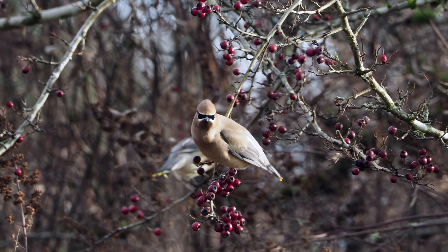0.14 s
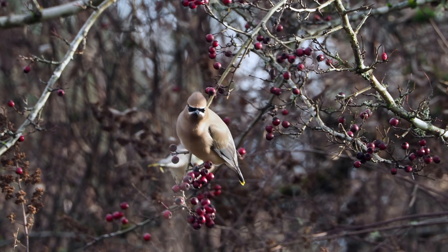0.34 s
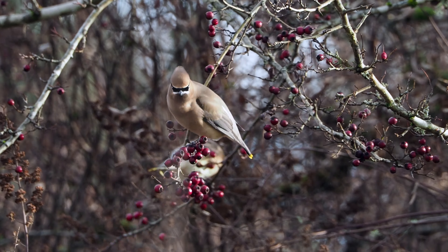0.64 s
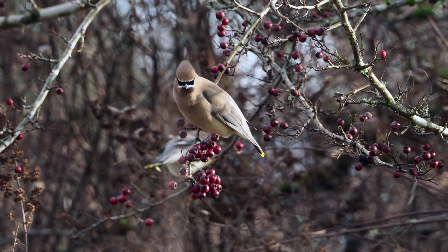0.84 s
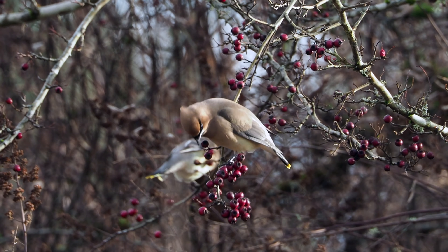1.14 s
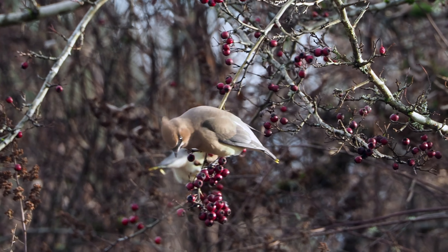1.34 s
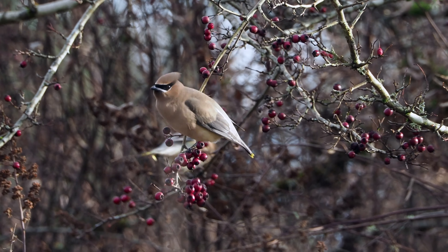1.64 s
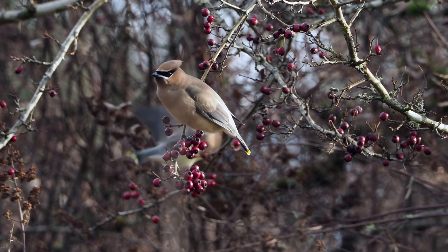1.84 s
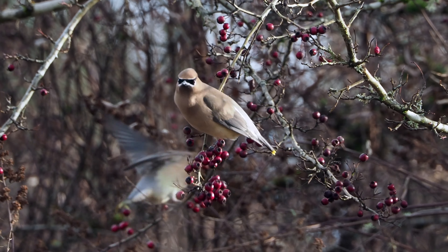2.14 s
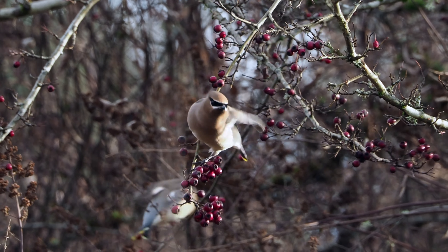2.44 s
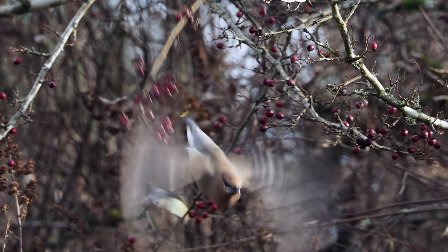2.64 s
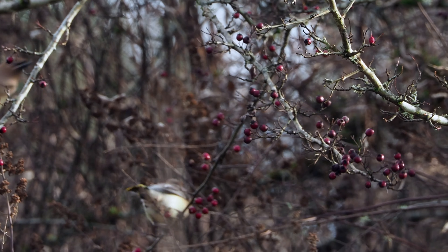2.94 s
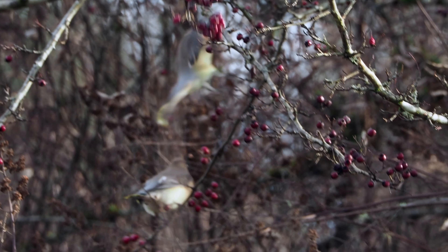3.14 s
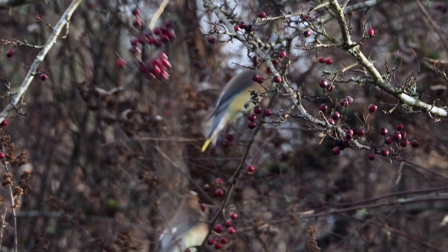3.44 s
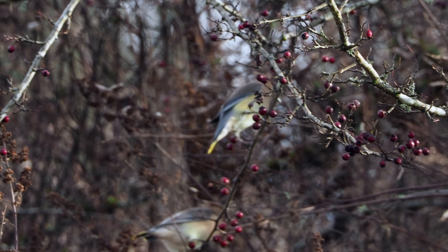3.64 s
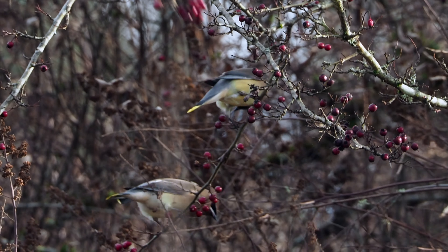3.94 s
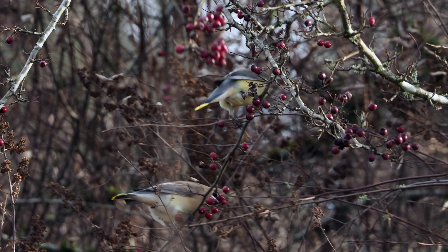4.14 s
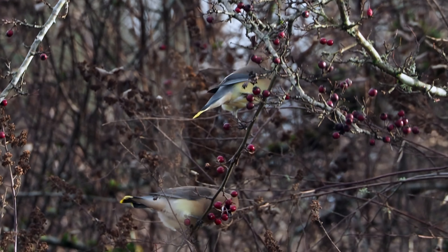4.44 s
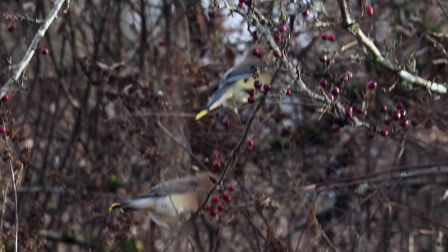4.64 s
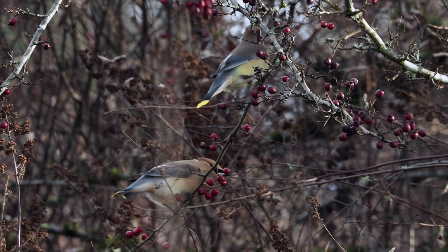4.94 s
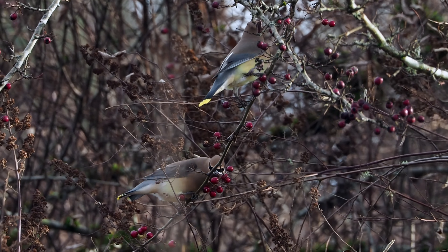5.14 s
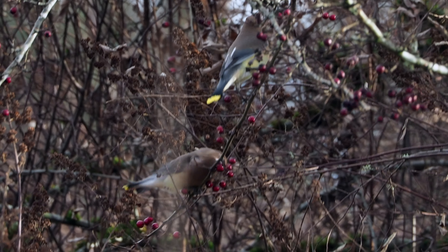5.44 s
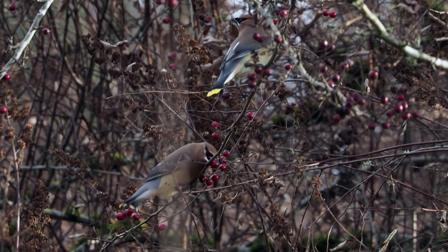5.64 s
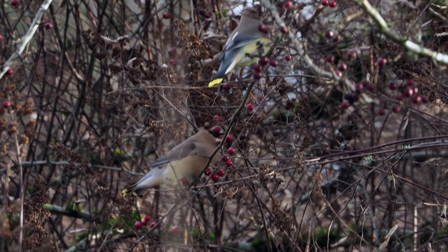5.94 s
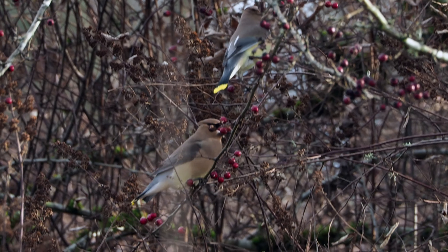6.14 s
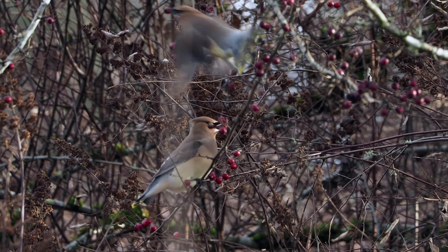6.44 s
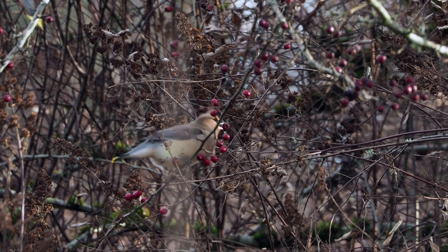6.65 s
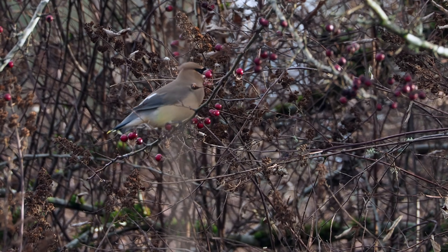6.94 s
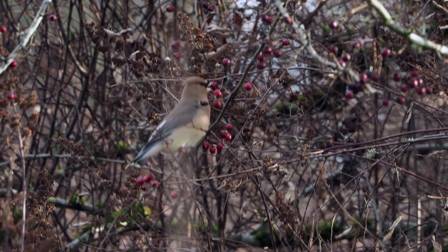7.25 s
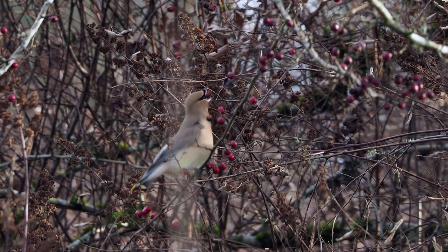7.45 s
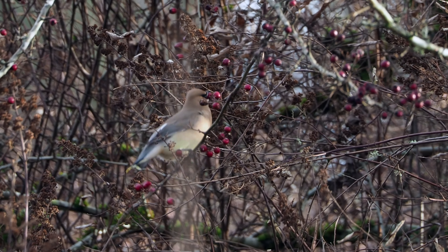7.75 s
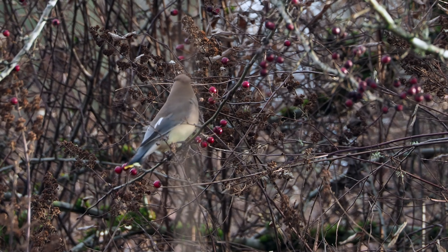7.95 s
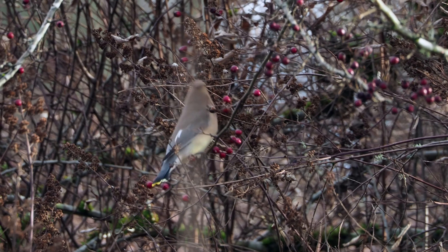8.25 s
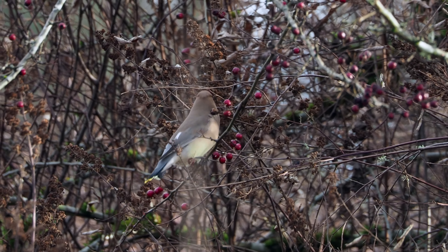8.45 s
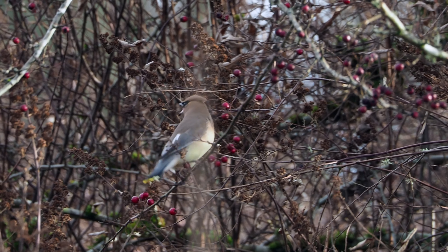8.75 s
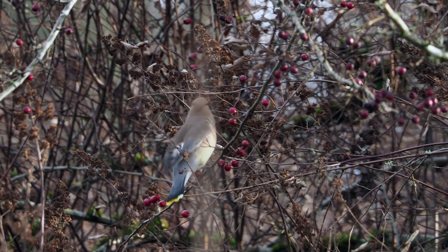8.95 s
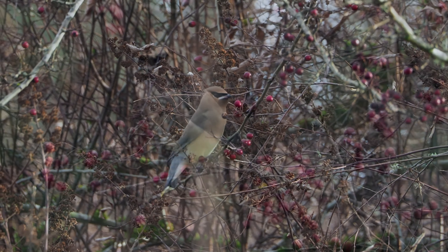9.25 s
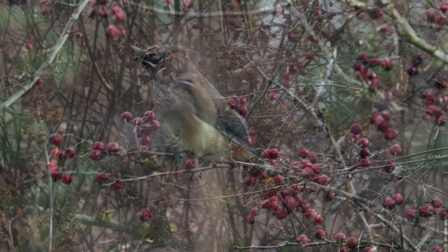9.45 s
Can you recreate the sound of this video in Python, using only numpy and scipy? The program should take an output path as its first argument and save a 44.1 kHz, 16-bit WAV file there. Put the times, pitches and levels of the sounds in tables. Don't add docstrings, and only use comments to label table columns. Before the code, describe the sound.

A small flock whistles, trills and buzzes very high in bare trees, with twig ticks, wing rustles and far road rumble beneath.

```python
import sys
import numpy as np
from scipy import signal
from scipy.fft import rfft, irfft, next_fast_len
from scipy.io import wavfile
from scipy.ndimage import uniform_filter1d, map_coordinates

SR = 44100
rng = np.random.default_rng(int(sys.argv[2]) if len(sys.argv) > 2 else 0)


def to_linear_factor(level_db):
    exponent = np.asarray(level_db, float) / 20
    return 10 ** exponent


def transcribe(signal):
    frames = np.atleast_2d(signal).T
    limited = np.clip(frames, -1, 1)
    pcm = np.round(limited * 32767).astype(np.int16)
    wavfile.write(sys.argv[1], SR, pcm)


N = 423360

# u/length, f/f_call, level/dB
SWELL_SHAPE = [(0, 1.01, -8), (1, .99, 0.5)]
# u/length, f/f_call, level/dB
FADE_SHAPE = [(0, 1.03, -2.5), (.3, 0.99, -3.5), (1, 1, -8.5)]
# u/length, f/f_call, level/dB
SLIDE_SHAPE = [(0, 0.99, -4), (.5, .93, -1.5), (1, .85, -8.5)]


def unit(x):
    return x / np.sqrt(np.mean(x ** 2) + 1e-20)


def along(points, f_hz):
    f, value = np.transpose(points)
    return np.interp(np.log(f_hz + 1), np.log(f + 1), value)


def wobble(rate_hz, size=N):
    knots = rng.standard_normal(int(size * rate_hz / SR) + 4)
    return map_coordinates(knots, [np.arange(size) * rate_hz / SR])


def filtered(x, response):
    m = next_fast_len(N + SR // 2)
    return irfft(rfft(x, m) * response(np.fft.rfftfreq(m, 1 / SR)), m)[..., :N]


def add(out, sound, t_s):
    part = out[:, round(t_s * SR):][:, :sound.shape[1]]
    part += sound[:, :part.shape[1]]


def rush(spectrum, patchy_db):
    # f/Hz, correlation
    alike = [(60, .993), (150, .95), (350, .88), (1000, .73), (2500, .3), (8000, .1)]
    # f/Hz, level/dB
    lean = [(300, -0.5), (1100, -5), (3000, -4), (7000, -0.5), (13000, -4)]
    z = signal.stft(rng.standard_normal((2, N)), nperseg=512)[2]
    field = uniform_filter1d(rng.standard_normal(z.shape[1:]), size=5, axis=0)
    field = uniform_filter1d(field, size=12, axis=1)
    patchy = signal.istft(z * to_linear_factor(patchy_db * unit(field)), nperseg=512)[1][:, :N]
    shared, apart = rfft(patchy)
    f_hz = np.fft.rfftfreq(N, 1 / SR)
    side = np.array([[.5], [-.5]])
    turn = np.arccos(np.clip(along(alike, f_hz), 0, 1)) / 2
    gain = to_linear_factor(along(spectrum, f_hz) + side * along(lean, f_hz))
    lag = np.exp(-8j * np.pi * side * f_hz / SR)
    mix = shared * np.cos(turn) + 2 * side * apart * np.sin(turn)
    return unit(irfft(gain * lag * mix, N))


def puffs(events, centre_hz, width_hz, rise_s, fall_s, order=3):
    out = np.zeros((2, N))
    t = np.arange(SR // 4) / SR
    envelope = (1 - np.exp(-t / rise_s)) * np.exp(-t / fall_s)
    for t_s, db in events:
        add(out, to_linear_factor(db) * envelope * rng.standard_normal((2, len(t))), t_s)

    def resonance(f):
        damping = 1j * f * width_hz
        return (damping / (centre_hz ** 2 - f * f + damping)) ** order

    return filtered(out, resonance)


def sung(*kinds):
    contours, pans_db = [], []
    for shape, calls in kinds:
        for t_s, length_s, hz, db, pan_db in calls:
            contours.append([(t_s + u * length_s, hz * bend, db + under) for u, bend, under in shape])
            pans_db.append(pan_db)
    return contours, pans_db


def voices(calls, pans_db, rate_hz, warble, fray, pulse, octave_db, wander=.007, spike=0):
    out = np.zeros((2, N))
    side = np.array([[.5], [-.5]])
    for rows, pan_db in zip(calls, pans_db):
        t_s, hz, db = np.transpose(rows)
        t = np.arange(t_s[0], t_s[-1] + 0.012, 1 / SR)
        size = len(t)
        beat = 2 * np.pi * np.cumsum(rate_hz * (1 + .3 * wobble(30, size))) / SR
        grow = 0.54 + (t - t_s[0]) / (t[-1] - t_s[0])
        if spike:
            dip = .6 * grow ** 2 * to_linear_factor(3 * wobble(40, size)) * (np.exp(spike * (np.cos(beat) - 1)) - .27)
        else:
            dip = grow * to_linear_factor(2.5 * wobble(40, size)) * (np.cos(beat) + .5 * np.cos(2 * beat))
        bend = 1 - warble * dip + fray * wobble(500, size) + wander * wobble(28, size)
        pitch_hz = uniform_filter1d(np.interp(t, t_s, hz), size=200) * bend
        edge = np.clip(np.minimum(t - t[0], t[-1] - t) / .009, 0, 1)
        level = to_linear_factor(np.interp(t, t_s, db) + 1.7 * wobble(90.2, size))
        level = level * edge * (1 + pulse * np.sin(beat))
        lead_rad = 1.75 * np.tanh(pan_db / 2.5) + rng.normal(0, .4)
        phase = 2 * np.pi * np.cumsum(pitch_hz) / SR + side * lead_rad
        overtone = to_linear_factor(octave_db - 9 * side) * np.sin(2 * phase)
        add(out, np.sqrt(2) * level * to_linear_factor(side * pan_db) * (np.sin(phase) + overtone), t_s[0])
    return out


def ground():
    # t/s, drone level/dB, air level/dB
    course = [(0.15, -40.5, -55.5), (0.63, -42.5, -50.5), (0.89, -41, -53), (1.6, -41.5, -54),
              (2.2, -42.5, -53.5), (2.5, -40, -54), (2.8, -42.5, -54.5), (3.4, -38.5, -53),
              (3.8, -42.5, -55), (4.4, -38, -54), (5.1, -41, -55), (5.76, -46.5, -55.5), (6.2, -43.5, -55),
              (7.2, -45, -55), (8.2, -43, -55), (8.7, -45.5, -54.5), (9.3, -43, -54)]
    # f/Hz, density/dB
    rumble_spectrum = [(12, -35), (20, -6.5), (62, 2), (150, -15), (200, -44), (330, -120)]
    # f/Hz, density/dB
    air_spectrum = [(240, -26.5), (400, -3), (473, -4.5), (861, -5), (1000, -1), (1800, -17.5),
                    (2800, -15.5), (4300, -22.5), (6220, -24.5), (6920, -17.5), (8980, -29), (10300, -26.5),
                    (11300, -36.5), (13600, -28), (15600, -33.5)]
    # f/Hz, density/dB
    drone_spectrum = [(82, -15.5), (140, -3), (215, 1), (323, -7.5), (383, -18.5), (450, -36), (580, -70),
                      (990, -120)]
    # f/Hz, density/dB
    swell_spectrum = [(350, -21), (700, -3), (1050, 2.5), (1700, -14.5), (2300, -56)]
    t = np.arange(N) / SR
    t_s, *levels = np.transpose(course)
    drone_db, air_db = [np.interp(t, t_s, db) for db in levels]
    rumble = to_linear_factor(-37 + 0.38 * wobble(2.93)) * rush(rumble_spectrum, patchy_db=1.0)
    drone = to_linear_factor(drone_db + 1.7 * wobble(4)) * rush(drone_spectrum, patchy_db=1.5)
    air = to_linear_factor(air_db + 1.5 + 0.97 * wobble(3.2)) * rush(air_spectrum, patchy_db=0.37)
    swell = np.clip((t - 9.3) / 0.28, 0, 1) * to_linear_factor(-42.5)
    return rumble + drone + air + swell * rush(swell_spectrum, patchy_db=2.0)


def engine(count=40):
    first_s, firings_hz = 3.67, 15.0
    firings = zip(first_s + np.arange(count) / firings_hz, rng.normal(-32.5, 2.8, count))
    mono = puffs(firings, 1060, 450, rise_s=.004, fall_s=.011).sum(0)
    return to_linear_factor(np.array([[-3], [1.5]])) * mono


def chatter(count=480):
    # u/length, f/f_call, level/dB
    vault_shape = [(0, .57, -7.5), (.4, 0.95, -3.5), (.55, 1, -2), (.7, .95, -2), (1, .72, -5.5)]
    # t/s, length/s, f/Hz, peak/dB, L-R/dB
    vault_calls = [
        (8.51, 0.098, 3650, -54, 9),
        (8.7, .13, 3110, -52.5, 3),
        (8.88, .105, 3660, -61, 4),
        (9.05, 0.083, 3310, -48.5, 1),
        (9.2, .09, 3345, -45.5, -3),
        (9.389, 0.083, 3404, -43.5, 3),
    ]
    # t/s, f/Hz, level/dB, length/s, glide ratio
    spread, least = [N / SR, 1300, 8, .03, .4], [0, 2250, -73, .01, .78]
    rows = rng.random((count, 5)) * spread + least
    calls = [[(t_s, hz, db), (t_s + length_s, hz * glide, db + 7.5)] for t_s, hz, db, length_s, glide in rows]
    pans_db = rng.normal(-3, 5, count)
    notes = voices(calls, pans_db, 70, warble=.012, fray=.015, pulse=.4, octave_db=-40)
    vaults = sung((vault_shape, vault_calls))
    return notes + voices(*vaults, 70.05, warble=.02, fray=0.036, pulse=0.21, octave_db=-13)


def pips():
    # u/length, f/f_call, level/dB
    cut_shape = [(0, 1, -7), (.62, 0.91, -3), (1, 0.79, -14)]
    # u/length, f/f_call, level/dB
    land_shape = [(0, 1.25, 7), (.15, 1.04, -5.5), (.5, 1, -6.5), (1, .96, -9)]
    # u/length, f/f_call, level/dB
    arch_shape = [(0, .82, -4.5), (.45, 1, 2), (1, .8, -17)]
    # u/length, f/f_call, level/dB
    lift_shape = [(0, .88, -5), (.35, 1, 0), (1, 1, -4)]
    # u/length, f/f_call, level/dB
    snap_shape = [(0, .76, 3), (.25, .94, 0), (.5, 1, -3), (.75, .92, 1.5), (1, .72, -9)]
    # u/length, f/f_call, level/dB
    climb_shape = [(0, .62, -6), (.4, 0.83, -4), (.8, 0.95, 0), (1, 0.96, 0)]
    # t/s, length/s, f/Hz, peak/dB, L-R/dB
    slide_calls = [(.0, 0.047, 3980, -59, 2), (.16, 0.051, 3080, -50, -2.5), (.95, 0.05, 2900, -53, -6.2),
                   (1.535, .035, 2600, -52, -8), (1.77, .12, 2050, -64, -1),
                   (2.31, 0.074, 2975, -47.5, -6.6), (3.7, 0.031, 2440, -53, -12),
                   (4.73, .07, 3800, -60, 0), (7.41, .05, 3500, -58, 0), (7.89, .05, 4800, -60, 0)]
    # t/s, length/s, f/Hz, peak/dB, L-R/dB
    cut_calls = [
        (.685, 0.047, 3320, -51.5, 1),
        (1.18, 0.05, 3280, -47, -10.5),
        (3.962, .045, 2950, -46.5, -1.5),
    ]
    # t/s, length/s, f/Hz, peak/dB, L-R/dB
    land_calls = [
        (1.6, .16, 2317, -49, -6),
        (2.405, .135, 2270, -55, -5),
        (3.15, 0.081, 2200, -51.5, -2),
        (5.965, 0.068, 2680, -46.5, -5),
        (7.855, .05, 2250, -56, 0),
    ]
    # t/s, length/s, f/Hz, peak/dB, L-R/dB
    arch_calls = [
        (3.07, 0.072, 2680, -54, -6),
        (3.289, 0.079, 2960, -49.5, 1),
        (3.73, 0.047, 2630, -47, -7),
        (3.765, 0.072, 2876, -41.5, -5),
        (4.426, 0.045, 2840, -52, 3),
    ]
    # t/s, length/s, f/Hz, peak/dB, L-R/dB
    lift_calls = [
        (4.48, 0.066, 3260, -48, 1.2),
        (6.775, 0.046, 2590, -47, 0),
        (7.61, .09, 2800, -62, -6.7),
    ]
    # t/s, length/s, f/Hz, peak/dB, L-R/dB
    snap_calls = [
        (6.945, 0.031, 3030, -46.5, -1.5),
        (6.945, 0.03, 1940, -54.5, 0),
        (7.112, .037, 3000, -47.5, -1),
        (7.112, 0.038, 1870, -56, -11),
    ]
    # t/s, length/s, f/Hz, peak/dB, L-R/dB
    rising_calls = [
        (0.041, 0.095, 2590, -56, 2),
        (.165, .03, 3600, -59.5, 1),
        (.91, 0.034, 3280, -53.5, -6),
        (5.679, 0.052, 3320, -57, 5),
        (6.46, 0.075, 3210, -59, -3),
    ]
    # t/s, length/s, f/Hz, peak/dB, L-R/dB
    dying_calls = [(.81, 0.037, 3135, -48, 10), (1.35, 0.153, 3300, -54, -7),
                   (1.35, 0.17, 3620, -62.5, -16), (3.84, 0.059, 2397, -46.5, -3.5),
                   (6.045, 0.093, 2210, -56.5, 0), (6.545, 0.069, 2635, -49.5, -6),
                   (6.62, 0.083, 2260, -54, -7), (7.66, 0.086, 1610, -58.5, -1.5),
                   (8.24, 0.11, 1925, -56.5, 1), (1.0, 0.14, 2210, -56, -6), (.26, .06, 2085, -62.5, 2)]
    # t/s, length/s, f/Hz, peak/dB, L-R/dB
    climb_calls = [
        (1.49, .11, 3300, -59, -8),
        (1.495, .03, 3200, -60, -6),
        (1.27, .02, 3100, -59, 0),
        (.76, .035, 2900, -57, 0),
        (1.64, .03, 6100, -63, 0),
        (5.0, .045, 5000, -63, -8),
    ]
    low = sung((SLIDE_SHAPE, slide_calls), (cut_shape, cut_calls), (land_shape, land_calls),
               (arch_shape, arch_calls), (lift_shape, lift_calls), (snap_shape, snap_calls),
               (SWELL_SHAPE, rising_calls), (FADE_SHAPE, dying_calls), (climb_shape, climb_calls))
    return to_linear_factor(1.5) * voices(*low, 85, warble=.005, fray=.006, pulse=.4, octave_db=-36)


def rustle():
    # last beat t/s, period/s, level/dB
    bouts = [
        (0.839, 0.054, -59),
        (1.52, 0.065, -57),
        (2.232, .068, -58.5),
        (2.9, 0.1, -65),
    ]
    # t/s, peak/dB
    tick_events = [
        (1.772, -62),
        (3.3254, -49),
        (3.8544, -60),
        (6.5685, -43),
        (6.8518, -42),
        (7.3894, -65),
        (7.4444, -58),
    ]
    # t/s, peak/dB
    chuck_events = [
        (2.9317, -55),
        (3.4116, -40),
        (4.0217, -40),
        (4.6264, -39),
        (4.7411, -51),
        (5.0985, -46.5),
        (5.226, -38.5),
        (5.501, -54),
    ]
    # t/s, peak/dB
    cluck_events = [
        (2.93, -57),
        (3.93, -55),
        (4.76, -51.5),
        (5.5, -51.5),
    ]
    beats = [(last_s - .018 - k * period_s, db - 3.1 * k) for last_s, period_s, db in bouts for k in range(6)]
    wings = puffs(beats, 6400, 4500, rise_s=0.0041, fall_s=0.019)
    shake_events = [(9.05, -40), (9.11, -37), (9.15, -41), (9.23, -40), (9.28, -42)]  # t/s, peak/dB
    shakes = puffs(shake_events, 6100, 5400, rise_s=0.0088, fall_s=0.025, order=5) * to_linear_factor(4 * wobble(60))
    ticks = puffs(tick_events, 5260, 18010, rise_s=0.00029, fall_s=0.003, order=1)
    chucks = puffs(chuck_events, 2800, 2000, rise_s=.008, fall_s=.009, order=6)
    clucks = puffs(cluck_events, 1287, 520, rise_s=0.0099, fall_s=0.023)
    return to_linear_factor(19) * wings + shakes + to_linear_factor(9.5) * ticks + to_linear_factor(22.5) * chucks + to_linear_factor(26.5) * clucks


def flock():
    # u/length, f/f_call, level/dB
    hook_shape = [(0, .86, -17), (.25, 0.975, -5.5), (.38, 0.97, -4), (.6, .995, -2.5), (.8, 1, -1.5),
                  (.96, 0.96, 0.5), (1, .84, -10.5)]
    # u/length, f/f_call, level/dB
    bow_shape = [(0, .87, -1.5), (.25, .95, -6.5), (.55, 0.98, -4.5), (.75, 0.98, -1), (1, 0.93, -9.5)]
    # u/length, f/f_call, level/dB
    level_shape = [(0, 0.95, -17), (.15, 0.99, -4.5), (.6, 1, 2.5), (1, 1, -2)]
    # u/length, f/f_call, level/dB
    sag_shape = [(0, 0.99, -1), (.2, 0.99, -2), (.4, 0.965, -4.5), (.8, .96, 2), (.88, .91, 4), (1, .9, 1)]
    # u/length, f/f_call, level/dB
    drop_shape = [(0, .86, -12), (.25, .94, -5), (.7, 1, -1.5), (.96, 1, 1), (1, 0.656, -14)]
    # u/length, f/f_call, level/dB
    step_shape = [(0, .89, -11), (.22, .985, -7.5), (.5, .99, -5), (.7, 1, -2), (1, .99, -1)]
    # u/length, f/f_call, level/dB
    ramp_shape = [(0, .83, -11), (.4, .99, 0.5), (.62, 1, -2), (1, .98, -13)]
    # u/length, f/f_call, level/dB
    wilt_shape = [(0, 0.97, -3), (.3, 1, -0.5), (.7, 0.95, -3), (.85, .91, 0), (1, .82, 2)]
    # u/length, f/f_call, level/dB
    ebb_shape = [(0, 1.01, -1), (.5, 1, -2), (1, .975, 0)]
    # u/length, f/f_call, level/dB
    plunge_shape = [(0, .96, -24), (.15, 1, -13.5), (.4, 0.95, -9), (.52, .77, 3), (.68, .65, -6.5),
                    (1, .61, -16)]
    # u/length, f/f_call, level/dB
    settle_shape = [(0, 1.2, -13), (.17, 1.06, -7.5), (.5, 1.01, 0), (.75, 1, -3.5), (1, 1.01, -13)]
    # u/length, f/f_call, level/dB
    swoop_shape = [(0, .62, -7.5), (.28, .86, -2.5), (.62, 0.98, -4), (.85, .89, -3), (1, .42, -5)]
    # u/length, f/f_call, level/dB
    roll_shape = [(0, .9, -10.5), (.1, .985, -8.5), (.36, 1.015, 0), (.48, .945, -4), (.62, .95, -2.5),
                  (.78, .985, 0), (1, 1, -4)]
    # u/length, f/f_call, level/dB
    drawl_shape = [(0, 1.03, 0), (.1, 1.02, -2), (.4, 1, -4.5), (1, .985, -6)]
    # t/s, length/s, f/Hz, peak/dB, L-R/dB
    hook_calls = [
        (0.454, 0.24, 8190, -50.5, 4),
        (0.521, 0.36, 8410, -45.5, -0.5),
        (1.221, 0.36, 8340, -44.5, 2.5),
        (1.419, .21, 8310, -48.5, 6),
        (1.888, .395, 8240, -44.5, -1.5),
        (3.059, 0.25, 8070, -42, 1),
    ]
    # t/s, length/s, f/Hz, peak/dB, L-R/dB
    bow_calls = [
        (8.639, .27, 7920, -48.5, 9.4),
        (9.39, 0.47, 7860, -48.5, 10),
        (.29, .12, 9500, -66, 1),
    ]
    # t/s, length/s, f/Hz, peak/dB, L-R/dB
    level_calls = [
        (0.191, .41, 6910, -58.5, 6),
    ]
    # t/s, length/s, f/Hz, peak/dB, L-R/dB
    sag_calls = [
        (3.62, .38, 8500, -54, 5),
    ]
    # t/s, length/s, f/Hz, peak/dB, L-R/dB
    swell_calls = [
        (1.001, .241, 7281, -52.6, -6.1),
        (0.001, .131, 6601, -63.1, 4.1),
    ]
    # t/s, length/s, f/Hz, peak/dB, L-R/dB
    fade_calls = [
        (.43, 0.22, 8900, -63, 1),
        (5.37, 0.25, 9400, -56, 8),
        (5.95, 0.26, 6620, -70, 11),
        (6.6, .25, 7200, -60, 6),
    ]
    # t/s, length/s, f/Hz, peak/dB, L-R/dB
    drop_calls = [
        (2.617, 0.29, 8170, -43.5, 1.6),
    ]
    # t/s, length/s, f/Hz, peak/dB, L-R/dB
    step_calls = [
        (3.465, .285, 7170, -47, -9.5),
        (.9, .1, 6950, -63, 0),
        (2.47, .15, 7150, -59, 0),
        (3.07, .14, 4200, -67, -3),
        (7.665, .165, 9650, -63, 12),
        (9.07, .055, 7150, -60, 5),
        (9.23, .07, 8250, -66, 5),
    ]
    # t/s, length/s, f/Hz, peak/dB, L-R/dB
    ramp_calls = [
        (2.629, 0.43, 7010, -51.5, -2.5),
    ]
    # t/s, length/s, f/Hz, peak/dB, L-R/dB
    wilt_calls = [
        (4.5, .28, 9370, -57.5, 4.3),
    ]
    # t/s, length/s, f/Hz, peak/dB, L-R/dB
    ebb_calls = [
        (2.652, 0.25, 9120, -60, 5),
        (2.352, .15, 8950, -66, 4),
        (2.8, .1, 6800, -52, -5),
        (2.3, .1, 6500, -64, 0),
    ]
    # t/s, length/s, f/Hz, peak/dB, L-R/dB
    plunge_calls = [
        (6.2, 0.19, 9140, -48, 5.1),
        (6.905, 0.2, 9080, -46.5, 5.6),
        (7.775, 0.18, 9130, -48.5, 6.8),
    ]
    # t/s, length/s, f/Hz, peak/dB, L-R/dB
    settle_calls = [
        (6.415, .185, 7080, -45, 6.9),
        (7.125, .175, 7020, -46, 8.6),
        (5.7, .15, 7210, -49, 4.1),
        (8.005, 0.14, 6850, -51.5, 10.7),
    ]
    # t/s, length/s, f/Hz, peak/dB, L-R/dB
    buzz_calls = [
        (5.51, 0.077, 7840, -50, 2),
        (1.96, 0.15, 7200, -51.5, 1),
        (1.27, 0.1036, 7300, -57, -0.5),
    ]
    # t/s, length/s, f/Hz, peak/dB, L-R/dB
    sink_calls = [
        (8.085, .11, 6730, -56, 9.4),
    ]
    # t/s, length/s, f/Hz, peak/dB, L-R/dB
    swoop_calls = [
        (6.45, .18, 7260, -51, -9),
        (6.721, .115, 6760, -45, -6.5),
    ]
    # t/s, length/s, f/Hz, peak/dB, L-R/dB
    trill_calls = [
        (3.53, 0.35, 6800, -48, -1.5),
        (4.07, 0.45, 6964, -43.5, -2),
        (4.68, 0.41, 6994, -44, -1.5),
        (5.28, 0.39, 6924, -45, 1.5),
    ]
    # t/s, length/s, f/Hz, peak/dB, L-R/dB
    drawl_calls = [
        (1.61, 0.51, 3203, -50, -8),
        (7.69, 0.5, 3207, -50.5, -7.5),
    ]
    clear = sung((hook_shape, hook_calls), (bow_shape, bow_calls), (level_shape, level_calls),
                 (sag_shape, sag_calls), (SWELL_SHAPE, swell_calls), (FADE_SHAPE, fade_calls),
                 (drop_shape, drop_calls), (step_shape, step_calls), (ramp_shape, ramp_calls),
                 (wilt_shape, wilt_calls), (ebb_shape, ebb_calls))
    rough = sung((plunge_shape, plunge_calls), (settle_shape, settle_calls),
                 (FADE_SHAPE, buzz_calls), (SLIDE_SHAPE, sink_calls))
    arcs, rolls = sung((swoop_shape, swoop_calls)), sung((roll_shape, trill_calls))
    long_low = sung((drawl_shape, drawl_calls))
    whistles = voices(*clear, 95, warble=.004, fray=.002, pulse=.2, octave_db=-38, wander=.007)
    swoops = voices(*arcs, 95, warble=.012, fray=.009, pulse=.4, octave_db=-38)
    trills = voices(*rolls, 52, warble=.07, fray=.011, pulse=.5, octave_db=-18, wander=.014, spike=3)
    buzzes = voices(*rough, 130, warble=.022, fray=.014, pulse=.6, octave_db=-38)
    drawls = voices(*long_low, 80, warble=.008, fray=.012, pulse=.5, octave_db=-36)
    return whistles + swoops + trills + buzzes + drawls


def wood(x, t60_s, piece=12288):
    out = np.zeros((2, N + SR))
    t = np.arange(SR // 2) / SR
    decay = to_linear_factor(-60 * t / t60_s) + 0.3 * to_linear_factor(-60 * t / 1.03)
    onset = 1 - np.exp(-t / 0.0011)
    fade = np.hanning(2 * piece + 1)[:-1]
    x = np.pad(x.mean(0), (piece, 2 * piece))
    for start in range(0, N, piece):
        tail = rng.standard_normal((2, len(t))) * decay * onset
        stretch = (x[start:start + 2 * piece] * fade)[None]
        wet = signal.fftconvolve(stretch, tail / np.linalg.norm(tail[0]), axes=1)
        out[:, start:start + wet.shape[1]] += wet
    return out[:, piece:piece + N]


def scene():
    near, far, close = flock() + rustle(), chatter(), pips()
    echoes = wood(to_linear_factor(-1.5) * near + to_linear_factor(-1.0) * far + to_linear_factor(-5.5) * close, t60_s=0.26)
    return near + close + to_linear_factor(-2.5) * far + echoes + ground() + engine()


def masked(x, margin_db, fall_db, size=16):
    z = signal.stft(x, nperseg=1024)[2]
    bands = z[:, :512].reshape(2, -1, size, z.shape[2])
    db = 10 * np.log10((abs(bands) ** 2).sum((0, 2)) + 1e-20)
    slope = fall_db * np.arange(len(db))[:, None]
    mask = np.maximum.accumulate(db[6:] + slope[6:]) - slope[6:] - margin_db
    keep = np.ones(db.shape)
    keep[6:] = db[6:] > mask
    z[:, :512] *= np.repeat(keep, size, axis=0)
    z[:, 367:] = 0
    return signal.istft(z, nperseg=1024)[1][:, :N]


def band_limit(x):
    return signal.sosfilt(signal.butter(12, 16470, fs=SR, output="sos"), x)


def record(dry):
    mix = masked(dry, margin_db=23, fall_db=2.8)
    return band_limit(mix)


dry = scene()
out = record(dry)
transcribe(out)
```